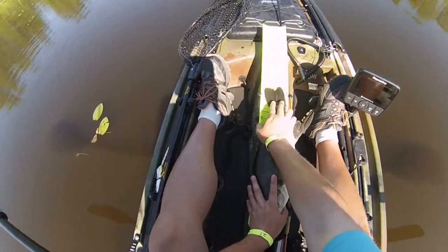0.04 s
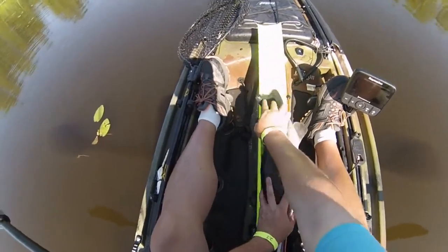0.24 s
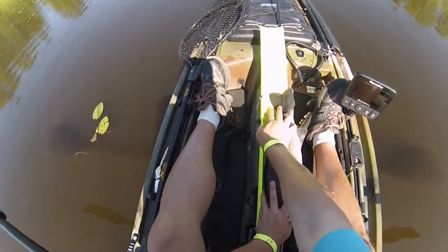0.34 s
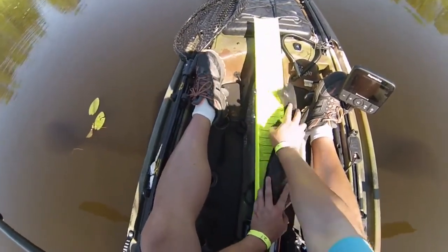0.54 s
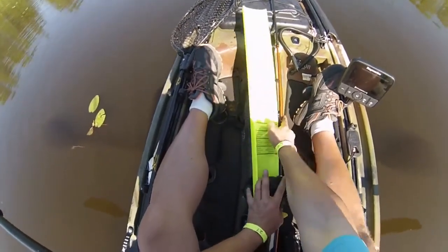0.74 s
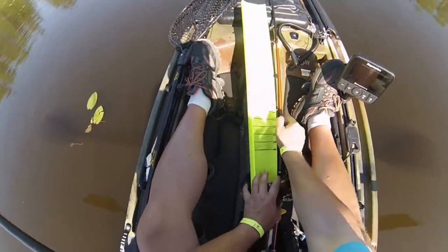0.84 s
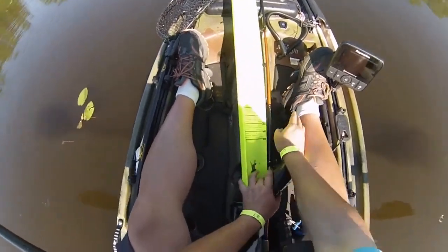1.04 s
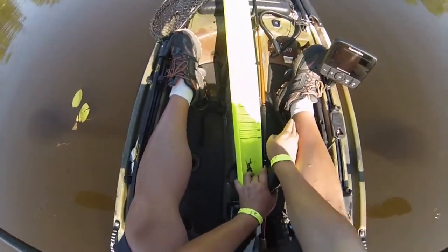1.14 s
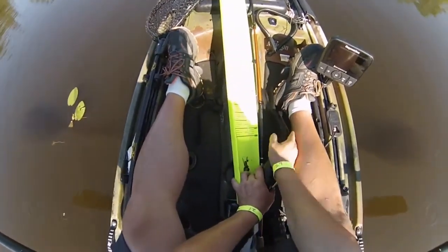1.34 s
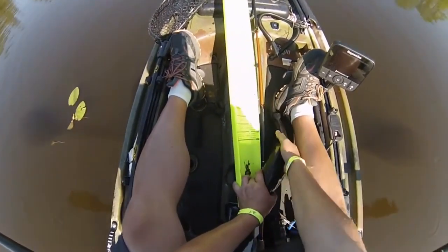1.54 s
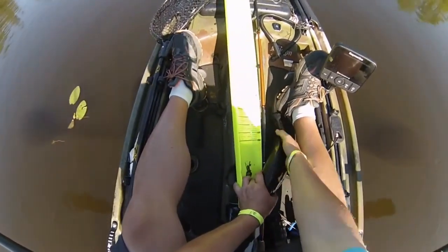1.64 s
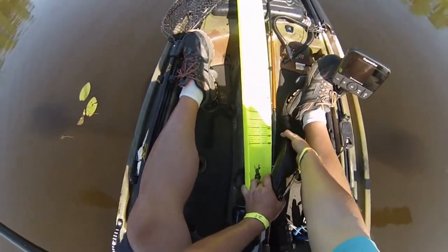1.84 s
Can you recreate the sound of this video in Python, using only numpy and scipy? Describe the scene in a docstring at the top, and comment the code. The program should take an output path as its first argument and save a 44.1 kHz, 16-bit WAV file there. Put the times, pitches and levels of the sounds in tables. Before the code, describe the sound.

Fish flopping in a small plastic boat: two bursts of wet slaps and hollow thumps, then faint birds

```python
"""A motor hums far off over quiet lake air. A wet fish then flops on a plastic measuring board in a small
plastic boat: noise bursts make crackling tail slaps that ring the board, pushed resonators make body thumps
on the hollow hull, random ringing blips make the wet slither, which swells with the strongest blows and stays
faint between them, and rumble follows its shifting weight. Later songbirds whistle on the far shore as
gliding sines, and a buzzy call of band noise joins them; all calls carry a diffuse echo."""
import sys
import numpy as np
from scipy import signal
from scipy.fft import rfft, irfft
from scipy.io import wavfile
from scipy.ndimage import uniform_filter1d

SR = 44100
rng = np.random.default_rng(int(sys.argv[2]) if len(sys.argv) > 2 else 0)


def master(y):
    """Save y as 16-bit WAV."""
    cut = np.clip(np.atleast_2d(y).T, -1, 1)
    pcm = np.round(cut * 32767)  # scale
    wavfile.write(sys.argv[1], SR, pcm.astype(np.int16))


def field_ratio(decibels):
    """Amplitude ratio for a level in dB (20 dB per decade); scalars and array-likes work."""
    return 10 ** (np.asarray(decibels, dtype=float) / 20)


N = 83790
t = np.arange(N) / SR

# distant motor tones (frequency [Hz], level [dB])
HUM_TONES = [(48.4, -63.5), (96.9, -66.5)]
# lake air spectrum (frequency [Hz], density [dB per Hz])
AIR_SPECTRUM = [(22, -9.5), (45, 0), (110, -8), (170, -20.5), (330, -18.5), (760, -31.5), (2500, -31.5),
                (9600, -35.5), (10900, -25.5), (12000, -34.5), (15600, -39.5)]
# weight shifting on the hull (time [s], level [dB])
ROCKING_LEVEL = [(.12, -65), (.25, -40.5), (.35, -44.5), (.48, -53), (.6, -62.5), (.7, -43.5), (.8, -36),
                 (.95, -51), (1.15, -62.5)]
# hull rumble spectrum (frequency [Hz], density [dB per Hz])
RUMBLE_SPECTRUM = [(22, 5.5), (156, -1.5), (391, -10), (702, -21), (1400, -28.5), (2600, -61)]
# slithering on the wet board (time [s], level [dB])
SLITHER_LEVEL = [(.1, -86.5), (.21, -63.5), (.262, -36), (.3, -59.5), (.37, -67), (.55, -68.5), (.625, -75),
                 (.66, -71), (.715, -54.5), (.75, -42), (.8, -55), (.87, -70.5), (.97, -70), (1.2, -82.5)]
# tail and fin slaps (time [s], level [dB], centre [Hz], contact [s])
SLAPS = [(.17, -63, 4100, 0.0024), (.19, -59, 8700, 0.0028), (0.2238, -50.5, 1820, 0.036),
         (.238, -43.5, 1280, 0.0059), (0.2464, -26.5, 2550, 0.0067), (0.249, -27.5, 1560, 0.0056),
         (0.273, -44, 4900, 0.0018), (0.307, -51, 2180, 0.025), (0.323, -49.5, 3350, 0.0033),
         (0.345, -64.5, 3880, 0.0069), (0.388, -54, 2780, 0.0042), (0.398, -56.5, 1800, 0.012),
         (0.444, -51.5, 1700, 0.016), (.504, -61, 1800, 0.027), (.533, -50, 2340, 0.0089),
         (0.583, -71, 3520, 0.027), (0.594, -57, 2160, 0.006), (0.605, -65, 3740, 0.011),
         (.634, -62.5, 2230, 0.0047), (0.65, -66.5, 4600, 0.02), (0.732, -32, 3020, 0.0052),
         (.738, -24.5, 4200, 0.00095), (0.764, -46, 2700, 0.011), (0.777, -37.5, 4484, 0.0045),
         (0.819, -56.5, 2900, 0.016), (.877, -58, 764, 0.0064), (1.056, -68.5, 4200, 0.004),
         (1.102, -64, 4430, 0.0085), (1.139, -68.5, 5060, 0.0029), (1.258, -68.5, 900, 0.0038),
         (1.447, -62.5, 4930, 0.0014)]
# board modes, before scatter per blow (frequency [Hz], gain [dB])
BOARD_MODES = [(1195, 5.5), (1670, -12.5), (2000, -2.5), (2400, 0), (3050, -8.5), (3690, -5), (5060, -5)]
# body thumps (time [s], level [dB], pitch [Hz])
THUMPS = [(0.251, -26.5, 320), (0.259, -30, 125.7), (0.287, -52, 88.5), (0.393, -40.5, 65),
          (0.453, -37.5, 146.5), (0.446, -39.5, 523), (0.536, -50, 310), (0.545, -48.5, 71),
          (0.64, -39, 112), (0.692, -34, 204), (.737, -24, 160.6), (0.751, -26.5, 105.3),
          (0.799, -22, 216.5), (0.81, -30, 230.7), (0.824, -31.5, 146), (0.878, -38, 151),
          (0.904, -40.5, 59.7), (0.941, -39.5, 157.3), (1.073, -46, 97.2), (1.258, -49, 220),
          (1.456, -43, 175.8), (1.551, -55, 193.3), (1.709, -50.5, 349.5), (1.843, -49.5, 200)]
# hull modes, before scatter per thump (frequency [Hz], gain [dB])
HULL_MODES = [(170, -1), (265, 6), (320, 0.5), (398, 4.5), (515, 0.5)]
# whistles (time [s], length [s], start [Hz], end [Hz], level [dB])
WHISTLES = [(0.654, 0.12, 2860, 2310, -68.5), (0.81, 0.082, 3490, 3316, -65.5),
            (0.91, 0.047, 2870, 2950, -70.5), (1.251, 0.063, 7720, 7540, -89.5),
            (1.456, 0.034, 5420, 4720, -70.5), (1.484, 0.0099, 4900, 5400, -70.5),
            (1.496, 0.018, 7130, 7000, -75), (1.515, 0.031, 6950, 4685, -75),
            (1.531, 0.0436, 4560, 4350, -69.5), (1.565, 0.11, 4316, 4460, -81),
            (1.464, 0.16, 2914, 2856, -85), (1.671, 0.037, 5330, 4360, -75.5),
            (1.738, 0.024, 4730, 5390, -71.5), (1.82, 0.053, 8200, 6000, -83.5)]

AIR_DB = -70.5
WET_PEAK_HZ, WET_FALL_DB_PER_OCT, WET_RISE_DB_PER_OCT = 1800, -7.5, 1.0  # fall above the peak, rise up to it
WET_BURSTS_PER_S, WET_CYCLES = 800, 45  # per band; cycles to fade by 60 dB
GRAIN_DB = 2.2  # size scatter of the crackle
SLAP_RISE_S, SLAP_TAIL_DB, SLAP_TAIL_S = 0.00065, -16.5, 0.012
SLAP_HISS_DB = -9.5  # unfiltered noise in a slap
POP_DB, POP_CYCLES = -4, 25  # trapped air; cycles to fade by 60 dB
BOARD_DB, BOARD_T60_S, BOARD_SCATTER_DB = -21.5, 0.028, 3
THUMP_CYCLES, HULL_CYCLES = 15.0, 18  # cycles to fade by 60 dB
HULL_DB, HULL_SCATTER_DB = -15, 2.8
KNOCK_DB, KNOCK_HZ, KNOCK_S = -15, 426, 0.0078  # dull rattle on each thump
CHATTER_S, CHATTER_WIDTH_S, CHATTER_HZ, CHATTER_DB = 1.749, 0.081, 5400, -73.5  # buzzy distant call
SHORE_DB, SHORE_T60_S = -8, 0.5
TOP_HZ, MIC_LOW_HZ = 15600, 46.4


def unit(x):
    """Scale to rms 1."""
    return x / np.sqrt(np.mean(x ** 2))


def curve(rows):
    """Gain over time from (time [s], level [dB]) points."""
    return field_ratio(np.interp(t, *np.array(rows).T))


def colour(x, points):
    """Shape the spectrum by (frequency [Hz], density [dB per Hz]) points; rms 1."""
    hz, db = np.array(points).T
    f = np.maximum(np.arange(N // 2 + 1) * SR / N, 1)
    gain = field_ratio(np.interp(np.log(f), np.log(hz), db))
    return unit(irfft(rfft(x) * gain, N))


def walk(rate_hz):
    """Smooth random wander, rms 1, with rate_hz new values per second."""
    hold = int(SR / rate_hz)
    steps = np.repeat(rng.standard_normal(N // hold + 1), hold)
    smooth = uniform_filter1d(uniform_filter1d(steps, hold), hold)
    return unit(smooth[:N])


def ring(x, hz, t60_s):
    """One damped mode, T60 at least 4 ms; a unit impulse starts a unit sine."""
    radius = np.exp(-np.log(1000) / (max(t60_s, 0.004) * SR))
    w = 2 * np.pi * hz / SR
    return signal.lfilter([0, np.sin(w)], [1, -2 * radius * np.cos(w), radius * radius], x)


def grains(size):
    """Noise whose samples scatter widely in size, as tearing water films do."""
    return rng.standard_normal(size) * field_ratio(GRAIN_DB * rng.exponential(size=size))


def add(out, x, start_s):
    """Mix x into out at start_s."""
    i = int(start_s * SR)
    out[i:i + len(x)] += x[:N - i]


def hum():
    """Two motor tones that waver together in pitch and separately in level."""
    phase_per_hz = 2 * np.pi * np.cumsum(1 + 0.012 * walk(4)) / SR
    out = np.zeros(N)
    for hz, db in HUM_TONES:
        tone = np.sqrt(2) * np.sin(hz * phase_per_hz + rng.uniform(0, 2 * np.pi))
        out += field_ratio(db + 1.1 * walk(14.0)) * tone
    return out


def air():
    """Coloured noise with a slight wander in level."""
    return field_ratio(AIR_DB + 0.45 * walk(26.0)) * colour(rng.standard_normal(N), AIR_SPECTRUM)


def rocking():
    """Weight shifting on the hull: low noise with an uneven level."""
    rumble = colour(rng.standard_normal(N), RUMBLE_SPECTRUM)
    return rumble * curve(ROCKING_LEVEL) * field_ratio(2.0 * walk(29.79))


def slither():
    """Tiny water films burst at random, each a short blip at its own pitch, in sudden clumps."""
    out = np.zeros(N)
    clumps = field_ratio(5 * walk(220))
    for hz in 500 * 2 ** np.arange(0, 4.9, 0.2):
        hits = rng.random(N) < WET_BURSTS_PER_S / SR
        blips = unit(ring(hits * grains(N) * clumps, hz, WET_CYCLES / hz))
        octaves = np.log2(hz / WET_PEAK_HZ)
        density_db = WET_FALL_DB_PER_OCT * max(octaves, 0) + WET_RISE_DB_PER_OCT * min(octaves, 0)
        out += field_ratio(density_db) * np.sqrt(hz) * blips  # sqrt(hz): bands widen with pitch
    return unit(out) * curve(SLITHER_LEVEL)


def board(contact):
    """Contact noise plus the ringing board; each blow lands on another spot and excites modes differently."""
    spot_db = BOARD_SCATTER_DB * rng.standard_normal(len(BOARD_MODES))
    ringing = np.zeros(len(contact))
    for (hz, db), scatter_db in zip(BOARD_MODES, spot_db):
        ringing += field_ratio(db + scatter_db) * ring(contact, hz, BOARD_T60_S)
    # noise builds a mode up with the root of its ring time
    return contact + field_ratio(BOARD_DB) * ringing / np.sqrt(BOARD_T60_S * SR / 56)


def slaps():
    """Short crackling contacts with a wet tail; air trapped under the tail rings at the slap's centre."""
    out, u = np.zeros(N), t[:4096]
    for start_s, db, hz, contact_s in SLAPS:
        rise = 1 - np.exp(-u / SLAP_RISE_S)
        fall = np.exp(-(u / contact_s) ** 2) + field_ratio(SLAP_TAIL_DB) * np.exp(-u / SLAP_TAIL_S)
        noise = unit(grains(len(u)))
        b, a = signal.butter(2, [hz / 1.83, min(hz * 2.06, 18000)], "bandpass", fs=SR)
        body = unit(signal.lfilter(b, a, noise))
        pop = field_ratio(POP_DB) * unit(ring(noise, hz, POP_CYCLES / hz))
        contact = rise * fall * (body + pop + field_ratio(SLAP_HISS_DB) * noise)
        add(out, field_ratio(db) * board(contact), start_s)
    return out


def thumps():
    """A soft push, about half a cycle long, rings at its own pitch, wakes the hull modes and rattles briefly."""
    out, u = np.zeros(N), t[:16384]
    b, a = signal.butter(2, [KNOCK_HZ / 2, KNOCK_HZ * 2], "bandpass", fs=SR)
    for start_s, db, hz in THUMPS:
        push = np.sin(2 * np.pi * np.minimum(u * hz * 1.91, 1)) * 4 * hz / SR
        body = ring(push, hz, THUMP_CYCLES / hz)
        hull = np.zeros(len(u))
        for mode_hz, mode_db in HULL_MODES:
            gain = field_ratio(mode_db + HULL_SCATTER_DB * rng.standard_normal())
            hull += gain * ring(push, mode_hz, HULL_CYCLES / mode_hz)
        knock = unit(signal.lfilter(b, a, rng.standard_normal(len(u)))) * np.exp(-u / KNOCK_S)
        add(out, field_ratio(db) * (body + field_ratio(HULL_DB) * hull + field_ratio(KNOCK_DB) * knock), start_s)
    return out


def whistles():
    """Gliding sines; air over the lake makes the far calls flicker."""
    out = np.zeros(N)
    for start_s, length_s, start_hz, end_hz, db in WHISTLES:
        u = np.linspace(0, 1, int(length_s * SR))
        hz = start_hz + (end_hz - start_hz) * np.sin(np.pi / 2 * u) ** 2
        tone = np.sqrt(2) * np.sin(2 * np.pi * np.cumsum(hz) / SR)
        add(out, field_ratio(db) * np.sin(np.pi * u) ** 0.264 * tone, start_s)
    return out * field_ratio(3 * walk(130))


def chatter():
    """A buzzy distant call: band noise that swells and fades."""
    band_hz = [CHATTER_HZ / 1.36, CHATTER_HZ * 1.32]
    sos = signal.butter(2, band_hz, "bandpass", fs=SR, output="sos")
    buzz = unit(signal.sosfilt(sos, rng.standard_normal(N)))
    return field_ratio(CHATTER_DB) * buzz * np.exp(-((t - CHATTER_S) / CHATTER_WIDTH_S) ** 2)


def birds():
    """Whistles and chatter with a diffuse echo off the shore, made by decaying noise."""
    calls = whistles() + chatter()
    tail = rng.standard_normal(SR // 2) * field_ratio(-60 * t[:SR // 2] / SHORE_T60_S)
    echo = signal.fftconvolve(calls, tail / np.sqrt(np.sum(tail ** 2)))[:N]
    return calls + field_ratio(SHORE_DB) * echo


def scene():
    """Hum and air, fish on hull and board, birds; one channel."""
    return (hum() + air() + rocking() + slither() + slaps() + thumps() + birds())[None]


def roll_off(x):
    """The treble ends steeply here."""
    return signal.sosfilt(signal.butter(12, 15780, fs=SR, output="sos"), x)


def record(dry):
    """The microphone path cuts the top steeply and the deepest bass gently."""
    top_cut = signal.ellip(8, 0.2, 70, TOP_HZ, fs=SR, output="sos")
    bass_cut = signal.butter(2, MIC_LOW_HZ, "highpass", fs=SR, output="sos")
    mix = signal.sosfilt(bass_cut, signal.sosfilt(top_cut, dry))
    return roll_off(mix)


dry = scene()
out = record(dry)
master(out)
```